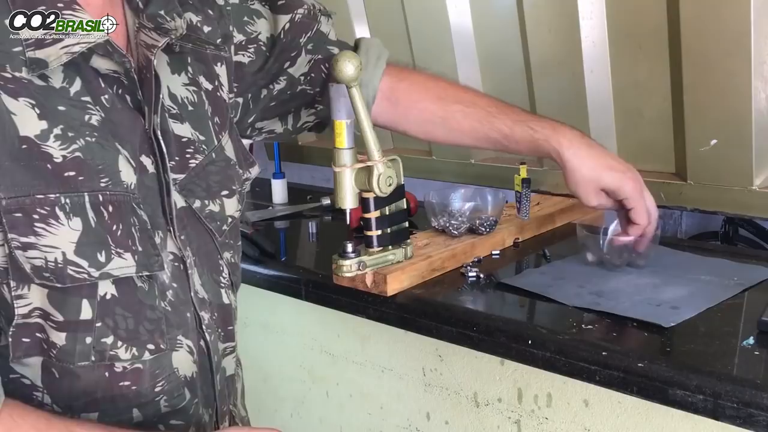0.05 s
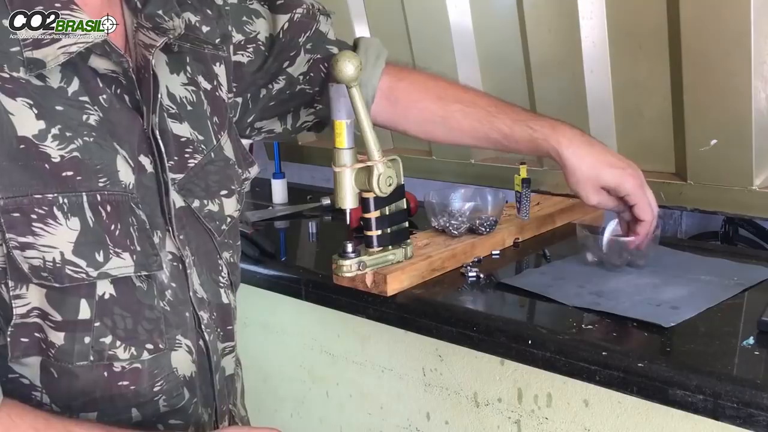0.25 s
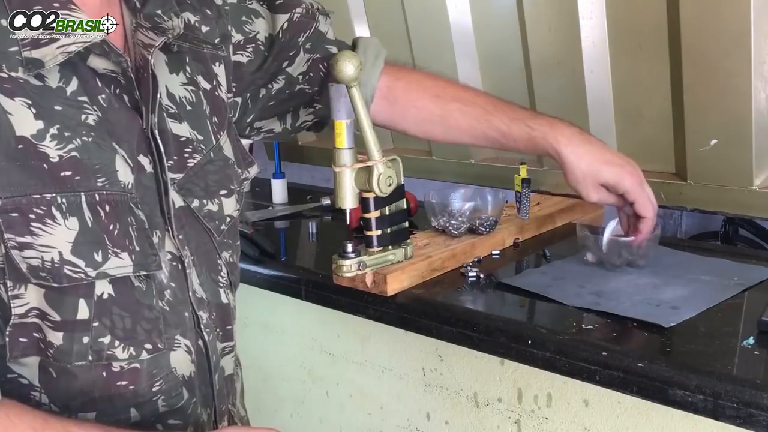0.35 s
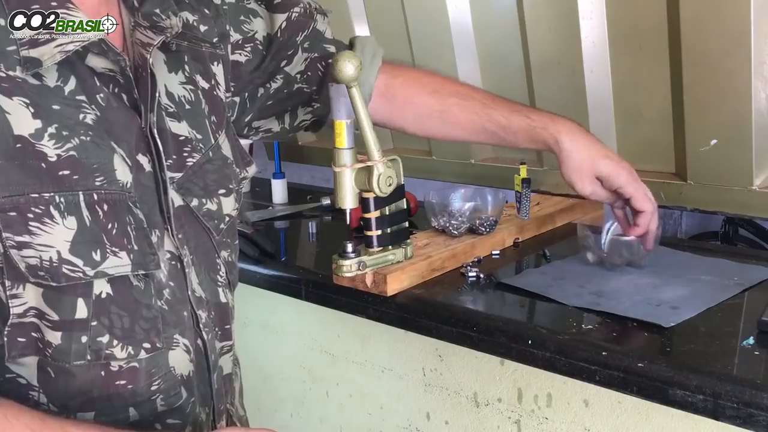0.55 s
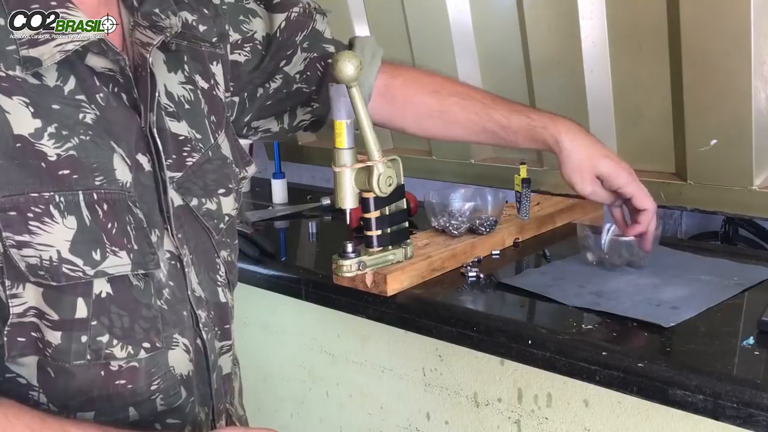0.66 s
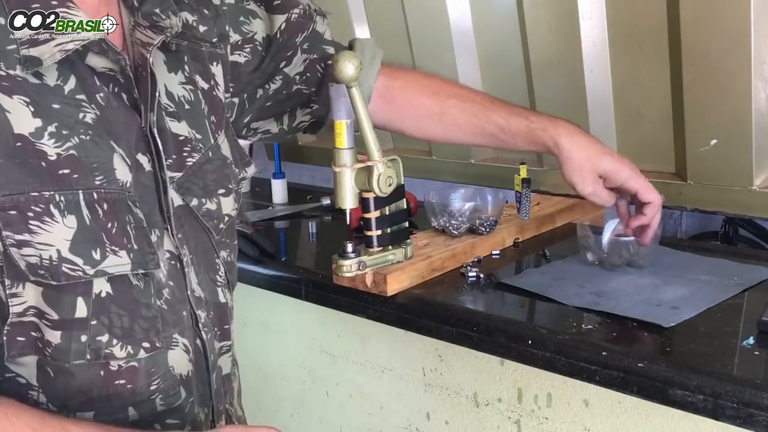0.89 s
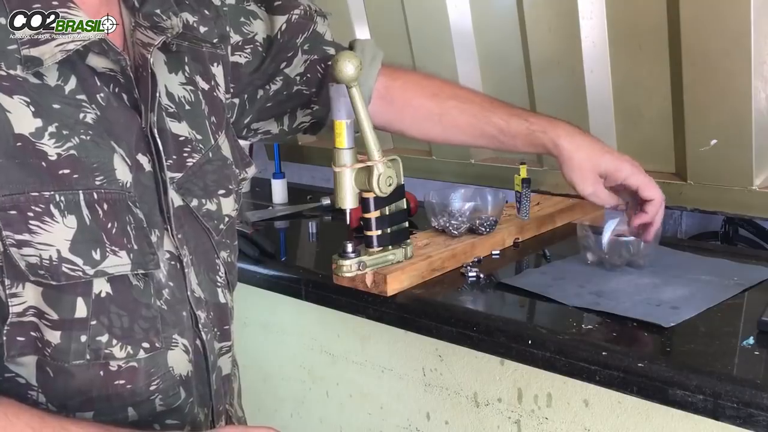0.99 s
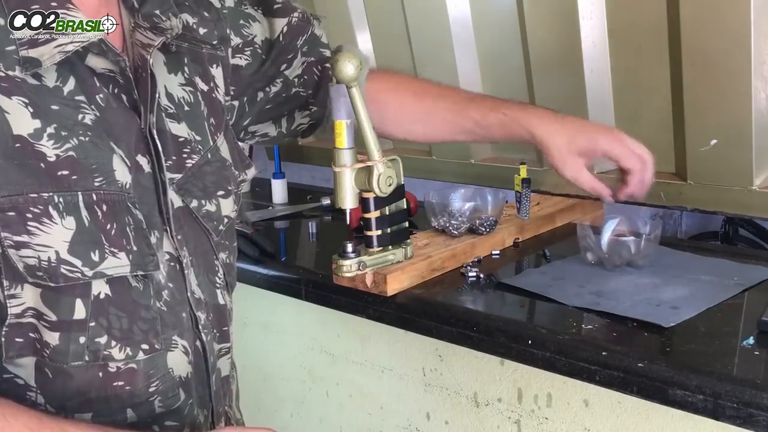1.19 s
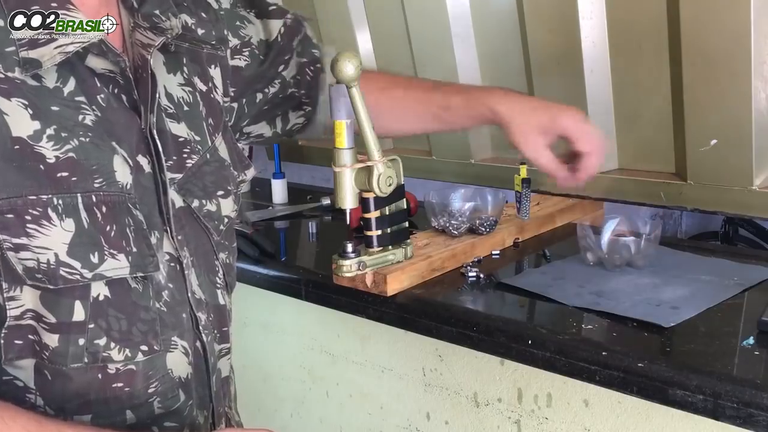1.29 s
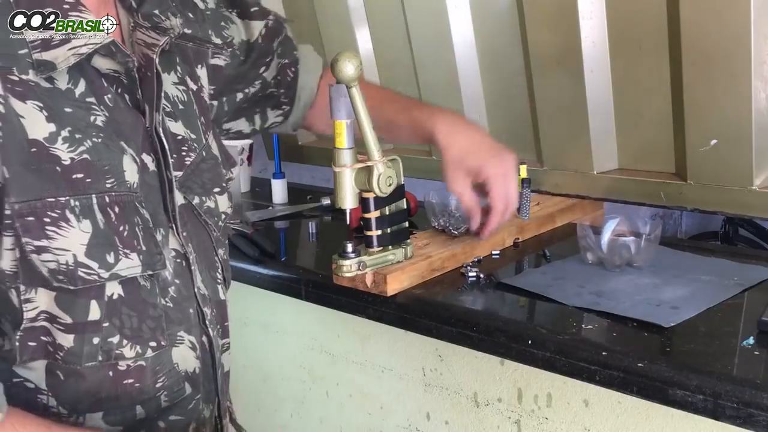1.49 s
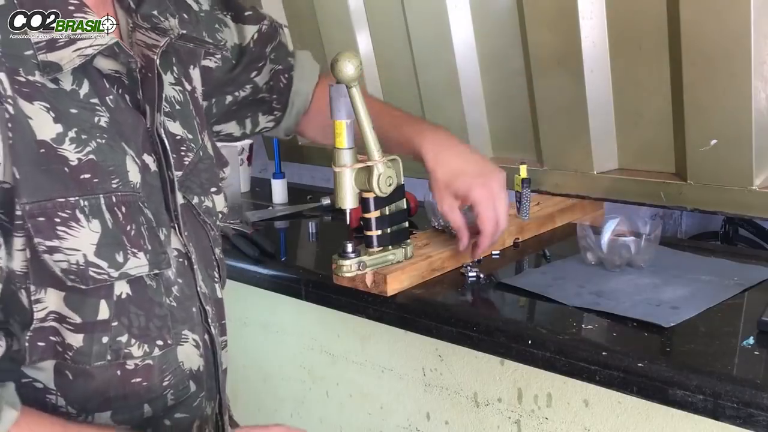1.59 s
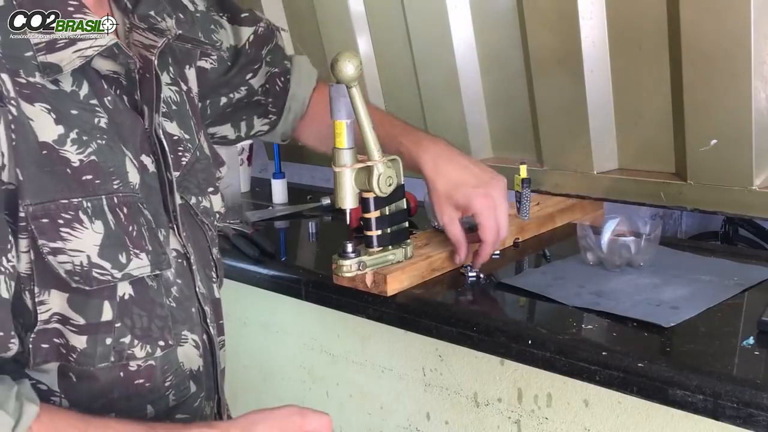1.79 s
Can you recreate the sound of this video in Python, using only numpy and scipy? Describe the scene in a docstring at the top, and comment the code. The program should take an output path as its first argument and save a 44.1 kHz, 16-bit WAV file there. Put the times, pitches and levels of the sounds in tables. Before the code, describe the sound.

Close by, little steel balls clink sharply in a glass bowl, tick faintly under the fingers, then clatter again and settle. Two quiet knocks and a rub on a workbench follow, over a low rumble in a slightly echoing workshop.

```python
"""Steel balls in a glass bowl

Fingers pick a small steel ball out of a glass bowl on a workbench: balls clack, knock the bowl and settle.
Each contact is a few milliseconds of chatter that rings bowl and balls. Faint scrapes tick in between,
then come two dull knocks and a rub at the bench. A hard-walled workshop rings on over a low rumble,
a soft rustle and a brief swell of hum, and the loudest clack hits a limiter."""
import sys
import numpy as np
from scipy import signal
from scipy.fft import rfft, irfft
from scipy.io import wavfile
from scipy.ndimage import uniform_filter1d, minimum_filter1d

SR = 44100
rng = np.random.default_rng(int(sys.argv[2]) if len(sys.argv) > 2 else 0)


def store_wav(level_fs):
    """Save 16-bit WAV to argv[1]."""
    pcm = np.round(np.clip(np.atleast_2d(level_fs), -1, 1) * 32767)
    wavfile.write(sys.argv[1], SR, pcm.T.astype(np.int16))


N = 81585

# Levels in the tables are relative.
# room rumble spectrum: f/Hz, level/dB
RUMBLE_EQ = [(31, -25), (44, 0), (70, -2), (110, -6), (170, -11), (300, -19.5), (550, -24.5), (1300, -28),
             (3000, -34), (7000, -52), (10500, -52), (12200, -45), (15500, -56)]
# rustle envelope: t/s, level/dB
RUSTLE_FADER = [(0, -48), (.12, -43), (.19, -50.5), (.6, -51), (.9, -57.5), (1.2, -63), (1.55, -52.5),
                (1.69, -49), (1.76, -60.5), (1.85, -66.5)]
# rustle spectrum: f/Hz, level/dB
RUSTLE_EQ = [(400, -22.5), (850, -6), (1400, 2), (2800, -6), (4500, -13.5), (6500, -10.5), (10000, -19),
             (16000, -17)]
# ball contacts: t/s, bowl ring/dB, clink/dB, ping/dB, crack/dB
CONTACTS = [(.0180, -14, -26, -31, -9.5), (.0328, -34, -40, -32, -18.5), (.0460, -23, -39, -29, -28),
            (.0622, -14.5, -38, -27, -20), (.0801, -11.5, -32, -28, -8.5), (.0985, -22, -29, -22, -24),
            (.1220, -17, -35, -28, -23), (.2086, 2, 13, 20.5, 11), (.2535, -5.5, -3, 5.5, 3.5),
            (.3260, -9, -18, -32, -10), (.4610, -16, -18.5, -34, -12), (.6010, -30, -29, -34, -27),
            (.6195, -23.5, -23.5, -40, -22), (.6430, -20.5, -40, -30, -24), (.7400, -23.5, -45.5, -47, -27),
            (1.0345, -40.5, -33, -48, -29.5), (1.2219, 4, -14, -8.5, 0.5), (1.2482, 1.5, 3, -13.5, 2),
            (1.2920, -8, -21, -24, -25), (1.3278, -7, -13, -19, -10), (1.3560, -23, -26, -20, -23),
            (1.3703, -11, -18, -24, -11), (1.3803, -22, -21, -21, -18), (1.3917, -14, -15, -25, -22),
            (1.4007, -15.5, -21, -19, -13), (1.4292, -18, -13.5, -18, -18), (1.4602, -13.5, -4, -6, -9.5)]
# modes of the glass bowl: f/Hz, level/dB, t60/s
BOWL_MODES = [(770, -0.5, 0.1), (851, -4, 0.02), (961, -2.5, .03), (1295, -3, 0.045), (1408, -3, .045),
              (1512, -4.5, 0.02), (1733, -3, 0.0085), (2007, 0.5, 0.029), (2470, -4.5, 0.0094),
              (2818, -8.5, 0.036), (3676, -6.5, 0.034), (4325, -12, 0.024)]
# modes of the balls' clink: f/Hz, level/dB, t60/s
CLINK_MODES = [(6020, 2.5, .025), (6290, 1, .016), (6586, 3, 0.014), (6960, 0, .009), (7600, -11.5, .005),
               (8270, -2, .006), (8700, -12.5, .005), (10910, -17.5, .004)]
# modes of the high ping: f/Hz, level/dB, t60/s
PING_MODES = [(5290, -7, 0.013), (5650, -7, .016), (7240, -3, .007), (7450, -6, 0.011),
              (8100, -10.5, 0.0037), (9110, 1, 0.0024), (9220, 1, 0.0048), (10450, -10, .005),
              (11520, -10, .004), (12250, -12.5, 0.0062), (16000, -20, .004)]
# spectrum of a contact's crack: f/Hz, level/dB
CRACK_EQ = [(400, -38.5), (800, -10.5), (2000, 0.5), (3100, -1.5), (4100, 4), (5300, -1.5), (7000, -2.5),
            (10000, 2.5), (12500, 1), (13500, -3), (15500, 3.5)]
# light scrapes of ball on ball: t/s, level/dB
TICKS = [(.0700, -30), (.2210, -6), (.6490, -19.5), (.6560, -26), (.6640, -30), (.8555, -25.5),
         (.9285, -27), (.9730, -25), (1.0670, -31), (1.0810, -23.5), (1.0905, -34), (1.0955, -25),
         (1.2020, -25.5), (1.2070, -29.5), (1.2115, -18.5)]
# scrape spectrum: f/Hz, level/dB
TICK_EQ = [(1000, -20.5), (5000, -15), (8000, -20), (10500, -14), (11900, -2), (12800, -3.5), (14000, -7),
           (16000, -8)]
# hum envelope: t/s, level/dB
HUM_FADER = [(0, -59), (.78, -60), (.85, -42), (1.16, -37.5), (1.27, -64.5), (1.85, -58)]
# contacts that make up the bench knocks: t/s, level/dB
KNOCKS = [(1.563, -16), (1.5680, -19.5), (1.5979, -11.5), (1.6051, -15), (1.6109, -14), (1.622, -24.5),
          (1.6590, -31), (1.6930, -23.5)]
# knock spectrum: f/Hz, level/dB
KNOCK_EQ = [(400, -21.5), (800, 0), (1100, -12), (1500, 2), (2200, -3), (3400, -18), (5000, -20),
            (15000, -21)]
# bench rub envelope: t/s, level/dB
RUB_FADER = [(1.70, -70), (1.75, -56), (1.79, -49), (1.85, -53.5)]
# bench rub spectrum: f/Hz, level/dB
RUB_EQ = [(150, -2.5), (300, -0.5), (600, -11.5), (1200, -3.5), (1850, 3), (2400, -20), (5000, -33.5)]
# workshop reverb bands: f/Hz, level/dB, t60/s
REVERB_BANDS = [(300, -4.5, 1), (795, -9.5, 0.34), (1100, -5.5, 0.39), (1363, 0, 0.76), (1490, -9.5, 0.3),
                (2670, -5, 0.95), (4457, -10, 0.53), (6260, -12, 0.63), (9200, -17.5, 0.55),
                (12000, -8, 0.22), (15700, -15, .25)]

TIME, FREQS = np.arange(N) / SR, np.fft.rfftfreq(N, 1 / SR)


def undb(db):
    """Decibels to gain."""
    return 10 ** (np.asarray(db) / 20)


def unit(x):
    """Scale to unit energy."""
    return x / np.sqrt(np.sum(x ** 2))


def per_bin(points):
    """A curve's value at every frequency bin, joined on a log axis."""
    hz, values = np.array(points, float).T
    return np.interp(np.log(FREQS + 1), np.log(hz), values)


def fader(points):
    """Gain over time, ramped in dB between breakpoints."""
    return undb(np.interp(TIME, *np.array(points).T))


def noise(gain):
    """Noise of rms 1, shaped by a gain per bin."""
    x = irfft(rfft(rng.standard_normal(N)) * gain, N)
    return x / x.std()


def wavering_noise(eq, waver_db=1.42, waver_hz=20):
    """Coloured noise whose level flutters at random."""
    return noise(undb(per_bin(eq))) * undb(waver_db * noise(np.exp(-FREQS / waver_hz)))


def impulse(eq):
    """A minimum-phase click with the given spectrum."""
    cepstrum = irfft(np.log(undb(per_bin(eq))), N)
    cepstrum[1:N // 2] *= 2
    cepstrum[N // 2:] = 0
    return unit(irfft(np.exp(rfft(cepstrum)), N)[:1024])


def ring(modes, attack_cycles=0.44):
    """Damped modes that build up quickly; where the blow lands sets their phases, drawn at random."""
    t = np.arange(8192) / SR
    out = 0
    for hz, db, t60 in modes:
        tone = np.sin(2 * np.pi * (hz * t + rng.random()))
        attack = 1 - np.exp(-t * hz / attack_cycles)
        decay = np.exp(-np.log(1000) * t / t60)
        out += undb(db) * unit(tone * attack * decay)
    return unit(out)


def chatter(length_s, snap_s=0.00018):
    """The force of one contact: a snap at first touch and a brief random rattle."""
    t = np.arange(1024) / SR
    window = np.exp(-(t / length_s) ** 4)
    snap = 1 + np.exp(-t / snap_s)
    force = rng.standard_normal(len(t)) * window * snap
    for _ in range(8):  # flatten the spectrum while keeping the burst short
        spectrum = rfft(force)
        force = irfft(spectrum / (abs(spectrum) + 1e-12)) * window
    return unit(force)


def strike(cues, length_s, response, column=1):
    """Fresh chatter drives response() at each cue, at the level in the given column."""
    out = np.zeros(2 * N)
    for cue in cues:
        start = int(cue[0] * SR)
        hit = unit(signal.fftconvolve(chatter(length_s), response()))
        out[start:start + len(hit)] += undb(cue[column]) * hit
    return out[:N]


def rumble(level_db=-43.5):
    """A bed of low, wavering room tone."""
    return undb(level_db) * wavering_noise(RUMBLE_EQ)


def rustle():
    """A soft midrange rustle, strongest at the start and around the knocks."""
    return fader(RUSTLE_FADER) * wavering_noise(RUSTLE_EQ)


def balls_in_bowl(rattle_s=0.0033, push_s=0.0023):
    """Four stems: a contact's rattle drives bowl ring and crack, its shorter main push clink and ping."""
    click = impulse(CRACK_EQ)
    bowl = strike(CONTACTS, rattle_s, lambda: ring(BOWL_MODES), column=1)
    clink = strike(CONTACTS, push_s, lambda: ring(CLINK_MODES), column=2)
    ping = strike(CONTACTS, push_s, lambda: ring(PING_MODES), column=3)
    crack = strike(CONTACTS, rattle_s, lambda: click, column=4)
    return bowl, clink, ping, crack


def ticks(contact_s=0.0031):
    """Balls rub under the fingers: tiny scrapes, mostly top treble."""
    scrape = impulse(TICK_EQ)
    return strike(TICKS, contact_s, lambda: scrape)


def hum(centre_hz=94.5, half_width_hz=6.8):
    """A narrow band of low noise that swells for a moment."""
    band = 1 / (1 + ((FREQS - centre_hz) / half_width_hz) ** 2)
    return fader(HUM_FADER) * noise(band)


def bench_knocks(contact_s=0.0051):
    """Soft, damped contacts as the hand comes down to the bench."""
    thud = impulse(KNOCK_EQ)
    return strike(KNOCKS, contact_s, lambda: thud)


def bench_rub():
    """A dull rub at the bench fades in at the very end."""
    return fader(RUB_FADER) * wavering_noise(RUB_EQ)


def workshop(send, predelay_s=0.0016, early_db=-9.5, early_t60_s=0.12):
    """Quick echoes off bench and wall, then a tail whose top treble dies first."""
    onset = np.clip((TIME - predelay_s) / predelay_s, 0, 1)
    fade = lambda t60: unit(onset * np.exp(-np.log(1000) * TIME / t60))
    echoes = undb(early_db) * rng.standard_normal(N) * fade(early_t60_s)
    white_spectrum = rfft(rng.standard_normal(N))
    tail = 0
    for hz, db, t60 in REVERB_BANDS:
        band = per_bin([(row[0], row[0] == hz) for row in REVERB_BANDS])  # crossfades into its neighbours
        tail += undb(db) * irfft(white_spectrum * band, N) * fade(t60)
    return signal.fftconvolve(send, echoes + tail)[:N]


def scene():
    """Mono mix: the noise bed, the close contacts and their workshop reverb."""
    stems = np.array([*balls_in_bowl(), ticks() + bench_knocks()])
    low_cut = signal.butter(4, 590, "high", fs=SR, output="sos")  # small bodies radiate little bass
    stems = signal.sosfilt(low_cut, stems)
    sends_db = [1, -0.5, -1.5, 2.5, -1.5]  # bowl, clink, ping, crack, ticks and knocks
    bed = hum() + rumble() + rustle() + bench_rub()
    reverb = workshop(undb(sends_db) @ stems)
    return (bed + stems.sum(axis=0) + reverb)[None]


def record(dry, ceiling=1.0, window_samples=15, top_hz=15700):
    """A fast limiter holds the loudest clack at full scale, then a steep filter cuts the top."""
    gain = ceiling / np.maximum(abs(dry), ceiling)
    held = minimum_filter1d(gain, window_samples)
    smoothed = uniform_filter1d(held, window_samples)
    high_cut = signal.ellip(10, .2, 70, top_hz, fs=SR, output="sos")
    return signal.sosfilt(high_cut, dry * smoothed)


dry = scene()
out = record(dry)
store_wav(out)
```